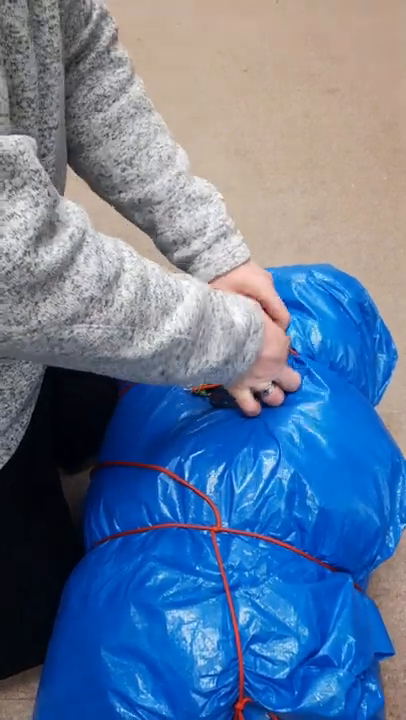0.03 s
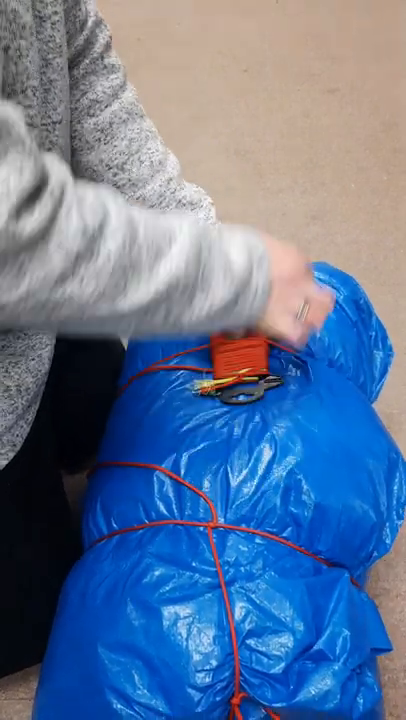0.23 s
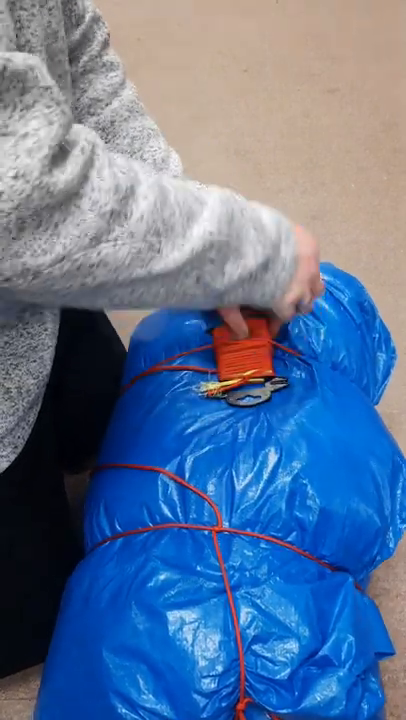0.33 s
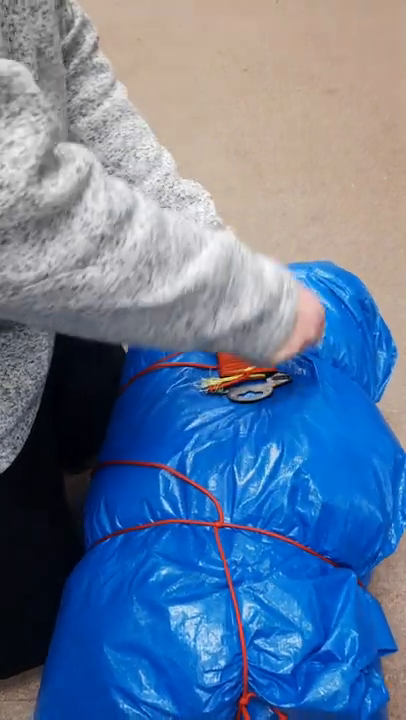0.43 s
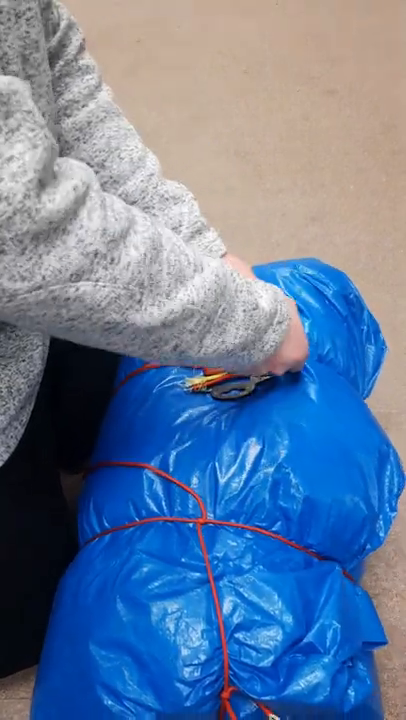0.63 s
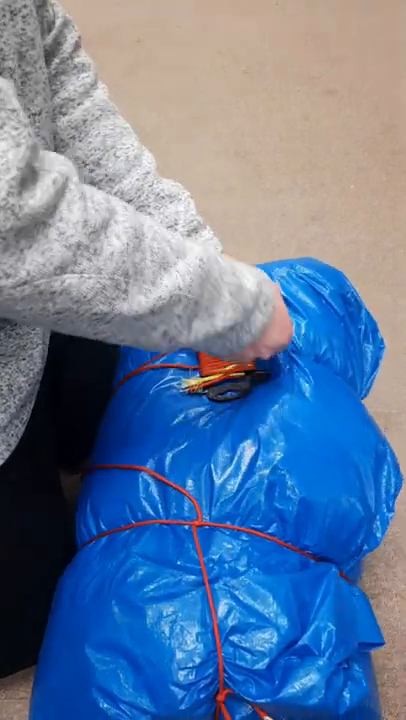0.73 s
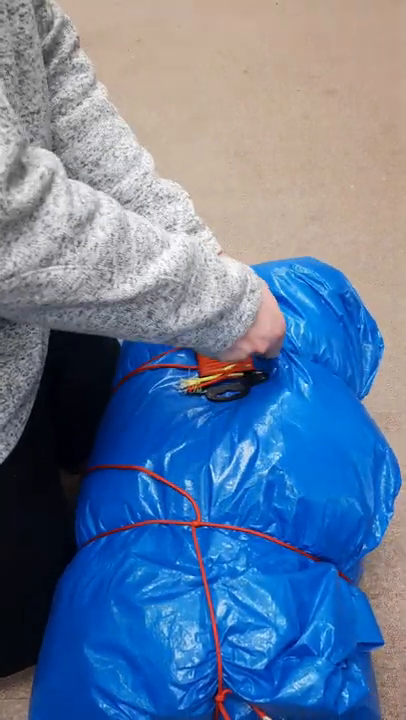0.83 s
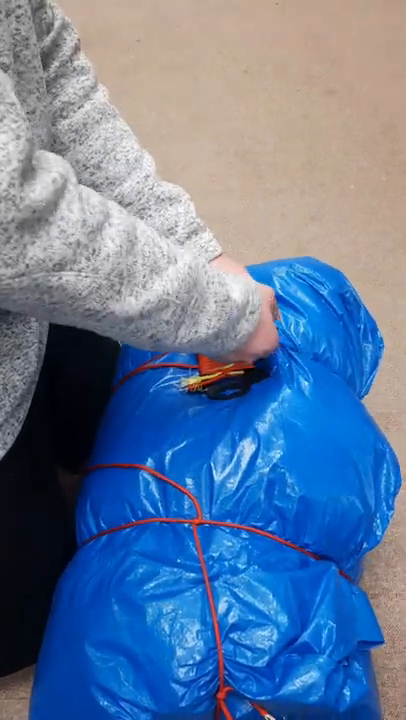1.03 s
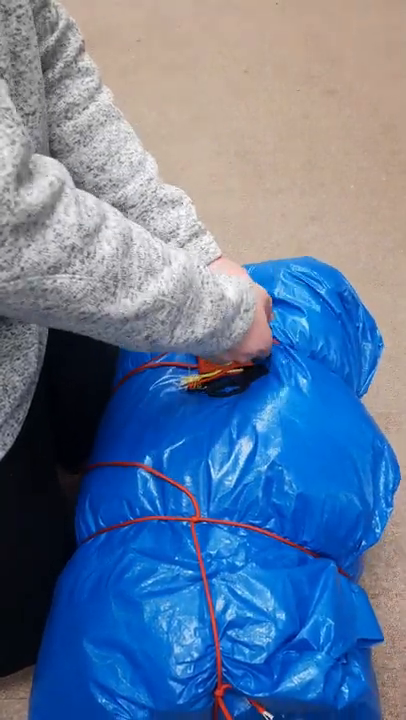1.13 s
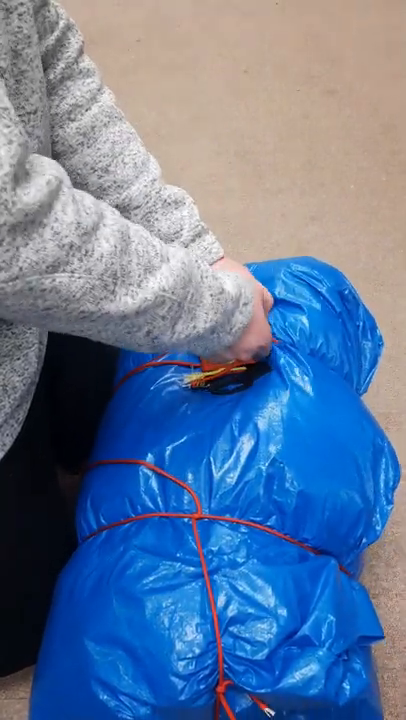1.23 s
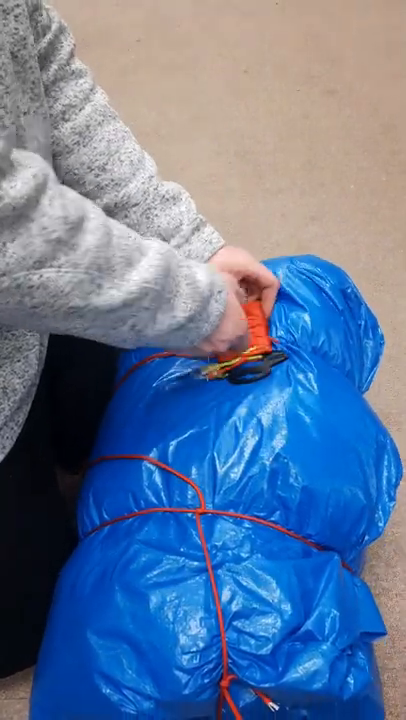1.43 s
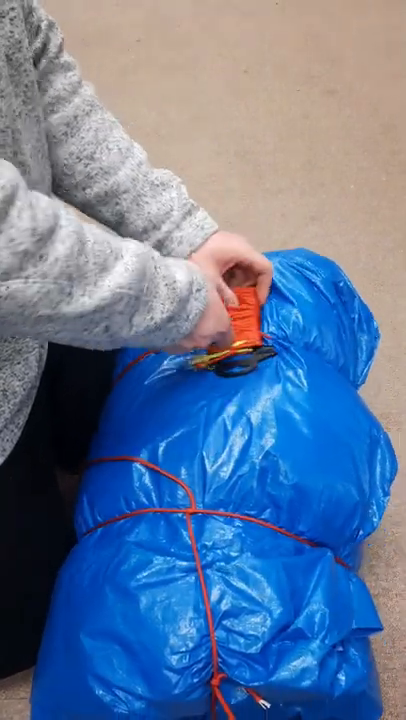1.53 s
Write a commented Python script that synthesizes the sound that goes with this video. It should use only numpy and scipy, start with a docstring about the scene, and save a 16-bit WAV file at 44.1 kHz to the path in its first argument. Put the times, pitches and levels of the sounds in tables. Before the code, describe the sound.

A plastic tarp crinkles and pops close up, then a strong hollow thump hits the taut bundle; smaller rustles and snaps follow, thinning out before a last brisk crinkle, in a small carpeted room.

```python
"""In a small carpeted room, hands work with cord on a bundle rolled in a plastic tarp.
The sheet rustles and its creases snap; the taut bundle gives one strong hollow thump and three fainter ones,
and short swishes follow as the cord is gripped and drawn tight. Rustle is shaped noise and clumped grains,
snaps and thumps are damped sines; echoes, a diffuse tail and a steady room tone surround them."""
import sys
import numpy as np
from scipy import signal
from scipy.fft import rfft, irfft
from scipy.io import wavfile

SR = 44100
rng = np.random.default_rng(int(sys.argv[2]) if len(sys.argv) > 2 else 0)


def file_out(sig):
    """Save sig as 16-bit WAV at sys.argv[1]."""
    # one column per channel
    cols = np.atleast_2d(sig).T
    # limit, then scale
    lim = np.clip(cols, -1, 1)
    pcm = np.round(lim * 32767).astype(np.int16)
    wavfile.write(sys.argv[1], SR, pcm)


N = 68355
T = np.arange(N) / SR  # time in seconds
BUNDLE_PAN_DB, RIGHT_LAG_S = .5, .00003  # left over right, and the later arrival at the right


def from_db(db):
    """Level law: decibels to amplitude gain."""
    return 10 ** (np.asarray(db) / 20)


def rms_one(x):
    """Power normalisation: scale to an rms of 1."""
    return x / np.sqrt(np.mean(x ** 2) + 1e-20)


def at_hz(points, hz):
    """Log-frequency interpolation: read a table evenly per octave."""
    table_hz, values = np.transpose(points)
    return np.interp(np.log(np.maximum(hz, 1)), np.log(table_hz), values)


def butter(x, hz, kind, order=2):
    """Causal filtering: a Butterworth response, flat in its passband."""
    sos = signal.butter(order, np.clip(hz, 10, .45 * SR), kind, fs=SR, output="sos")
    return signal.sosfilt(sos, x + 1e-18)


def coloured(x, spectrum):
    """Spectral shaping: weight each frequency by a table, then scale to an rms of 1."""
    gain = from_db(at_hz(spectrum, np.fft.rfftfreq(N, 1 / SR)))
    return rms_one(irfft(rfft(x) * gain, N))


def delayed(x, s):
    """Propagation delay: the same sound s seconds later."""
    return np.interp(T - s, T, x, left=0)


def ring(s, hz, t60):
    """Damped resonance: a sine set off at s that falls 60 dB in t60 seconds."""
    age = np.maximum(T - s, 0)
    return np.sin(2 * np.pi * hz * age) * from_db(-60 * np.minimum(age / t60, 4))


def placed(x, pan_db, lag_s):
    """Interchannel level and time difference: direct sound at the two microphones."""
    left = x * from_db(pan_db / 2)
    right = delayed(x, lag_s) * from_db(-pan_db / 2)
    return np.array([left, right])


# Likeness of the two channels in a diffuse field. Each row: frequency in Hz, likeness from 0 to 1.
LEFT_RIGHT_LIKENESS = [(100, 0.91), (250, 0.83), (500, 0.41), (1200, 0.07), (4000, 0)]


def diffuse_noise():
    """Diffuse-field coherence: white stereo noise, alike in the bass and unrelated in the treble."""
    alike = np.clip(at_hz(LEFT_RIGHT_LIKENESS, np.fft.rfftfreq(N, 1 / SR)), 0, 1)
    shares = np.sqrt([(1 + alike) / 2, (1 - alike) / 2])
    mid, side = rfft(rng.standard_normal((2, N))) * shares
    return irfft([mid + side, mid - side], N)


# Spectrum of the room tone. Each row: frequency in Hz, relative density in dB per Hz.
ROOM_TONE_SPECTRUM = [(20, -46), (40, -9), (65, 1), (120, 2.5), (200, -6), (330, -5), (500, -16),
                      (1000, -28), (3000, -33), (9000, -41.5), (16000, -41.5)]
ROOM_TONE_DB = -52


def room_tone():
    """Stationary background noise: a steady diffuse noise, strongest in the bass."""
    return from_db(ROOM_TONE_DB) * coloured(diffuse_noise(), ROOM_TONE_SPECTRUM)


CRACKLES_PER_S, CRACKLE_SPREAD_DB = 900, 4.0  # density at full activity; size scale
BUSY_DB, CALM_SHARE = -47, .12  # rustle level of full activity; least share of that density
CLUMP_DB, CLUMP_HZ = 4.0, 140  # depth and highest rate of the clumping
SMOOTH_SHARE = .33  # sliding noise beside the grains


def crackle(level):
    """Random impulse process: tiny buckles in clumps, sparser in gentle moves, over sliding noise."""
    busy = np.clip(level / from_db(BUSY_DB), CALM_SHARE, 1)
    signs = rng.choice([-1, 1], N)
    sizes = from_db(CRACKLE_SPREAD_DB * np.minimum(rng.exponential(1, N), 3)) * signs
    happens = rng.random(N) < busy * CRACKLES_PER_S / SR
    grains = rms_one(sizes * happens / np.sqrt(busy))  # sparse grains are larger, so power holds
    drift = rms_one(butter(rng.standard_normal(N), CLUMP_HZ, "low"))
    clumps = from_db(CLUMP_DB * np.clip(drift, -2, 2))
    return clumps * (grains + SMOOTH_SHARE * rng.standard_normal(N))


# The sheet is moved. Each row: start in seconds, swell in seconds, length in seconds from the start,
# rustle level in dB, treble hiss level in dB, low flapping level in dB.
SHEET_MOVES = [(-0.02, .005, 0.032, -46, -76, -35.5), (0.029, 0.0045, 0.023, -43, -57, -41.5),
               (0.057, 0.025, 0.14, -47.5, -61, -44), (0.148, 0.023, 0.047, -46.5, -50, -70),
               (0.21, 0.0014, 0.0095, -38.5, -56, -33.5), (0.528, 0.019, 0.049, -49.5, -59.5, -50.5),
               (0.641, .005, 0.029, -57, -71, -55.5), (0.7, 0.0044, 0.0089, -48, -49.5, -45.5),
               (0.827, 0.0038, 0.012, -46.5, -67, -53), (0.989, 0.008, 0.13, -63, -82, -61.5),
               (1.109, 0.015, 0.085, -58, -94, -58.5), (1.209, 0.0026, 0.029, -57.5, -85, -51),
               (1.264, .005, 0.074, -64.5, -77, -61), (1.397, 0.017, 0.07, -52, -68.5, -57),
               (1.429, 0.0086, 0.025, -42.5, -58, -55), (1.46, 0.0064, 0.10, -50.5, -59.5, -58)]
# Parts of the sheet that crinkle. Each row: left over right in dB, lag of the right side in seconds.
SHEET_PATCHES = [(15, .00009), (3, .00002), (6, -.00001)]
# Spectra of the three layers. Each row: frequency in Hz, relative density in dB per Hz.
RUSTLE_SPECTRUM = [(200, 17), (500, -20), (1000, 1), (2400, 0.5), (4000, -2), (6000, -8.5), (8000, -18),
                   (10000, -33), (16000, -54)]
HISS_SPECTRUM = [(2000, -28), (6000, 16), (8000, 8), (10000, 2), (14000, 11), (16000, 8)]
FLAPPING_SPECTRUM = [(30, -35), (60, -3.5), (100, 4), (200, -12), (340, -4), (550, -11), (1000, -14.5),
                     (3000, -39)]
RELEASE_S = 0.014  # time constant of each fade


def rustle():
    """Sheet radiation: moves raise crackle, hiss and low flapping; returns (mono, stereo, flapping)."""
    levels, mono, stereo = np.zeros((3, N)), 0, 0
    for start, swell, length, *db in SHEET_MOVES:
        rise = np.clip((T - start) / swell, 0, 1)
        fade = np.exp(-np.maximum(T - start - length, 0) / RELEASE_S)
        levels = np.maximum(levels, from_db(db)[:, None] * rise * fade)
    rustle_level, hiss_level, flapping_level = levels
    for pan_db, lag_s in SHEET_PATCHES:
        body = rustle_level * coloured(crackle(rustle_level), RUSTLE_SPECTRUM)
        hiss = hiss_level * coloured(crackle(rustle_level), HISS_SPECTRUM)
        patch = (body + hiss) / np.sqrt(len(SHEET_PATCHES))
        mono = mono + patch
        stereo = stereo + placed(patch, pan_db, lag_s)
    flapping = flapping_level * coloured(rng.standard_normal(N), FLAPPING_SPECTRUM)
    return mono, stereo, flapping


# Creases snap. Each row: start in seconds, level in dB, pitch in Hz,
# gritty edge in dB relative to the pop, left over right in dB.
CREASE_SNAPS = [(0.0250, -36, 1170, -35, 10), (0.0326, -24.5, 3230, -4.5, 6.5),
                (0.0482, -36, 3040, -26, -18), (0.0725, -28.5, 2560, -14, 6),
                (0.0816, -24.5, 2970, -36, 10.5), (0.1063, -25, 3870, -3.5, 2), (0.1245, -26, 1600, -14, 1),
                (0.1717, -53, 3500, 3, 6), (0.1761, -37, 1860, 10.5, 0), (0.2147, -14, 1620, -8, 11),
                (0.2162, -20.5, 3400, -10.5, 5.5), (0.2186, -28, 5000, -6, 0),
                (0.5020, -40, 1260, -5.5, 14), (0.53, -40, 3500, -3, 9), (0.5428, -35, 1400, -10, 6),
                (0.5715, -29.5, 2700, -3.5, 6), (0.6450, -27.5, 2600, -11.5, 6.5),
                (0.6935, -43.5, 1320, 0, 0), (0.7084, -24, 2310, -7, -0.5), (0.708, -33.5, 2310, -9, 22.5),
                (0.7801, -45, 2300, -28, 14), (0.8335, -32.5, 2200, -16, 14.5),
                (0.8390, -38.5, 2570, -12, 1), (0.8422, -51, 4160, -1, 27), (0.8885, -54, 1110, -26, 15),
                (0.9399, -40.5, 1300, -13, 7), (1.0406, -41.5, 720, -40, 11), (1.126, -42, 4200, -5, 15),
                (1.1434, -35.5, 1450, -9.5, 7), (1.1827, -39, 1700, -18, 4), (1.2150, -33.5, 1920, -17, 6),
                (1.2250, -33.5, 1210, -14, 9.5), (1.2417, -32, 6750, -7.5, -16),
                (1.2612, -36, 2120, -19, 6), (1.3778, -42.5, 902, -11, 9), (1.4145, -34.5, 1820, -22, 5),
                (1.4458, -25, 2350, -9, 0), (1.4551, -24.5, 3070, -11, 5), (1.4769, -25.5, 3900, -18, 8),
                (1.5005, -29, 3670, -14, 2), (1.5033, -34.5, 4400, -14, 24.5)]
SNAP_CYCLES = 5.9  # cycles of the pitch in a 60 dB decay
SNAP_EDGE_T60_S, SNAP_EDGE_CUT_HZ = 0.011, 3740


def snaps():
    """Snap-through buckling: a crease pops at its own pitch with a gritty edge; returns (mono, stereo)."""
    mono, stereo = 0, 0
    grit = butter(rng.standard_normal(N), [700, SNAP_EDGE_CUT_HZ], "band", order=1)
    for s, db, hz, edge_db, pan_db in CREASE_SNAPS:
        decay = np.exp(-np.log(1000) * np.clip((T - s) / SNAP_EDGE_T60_S, 0, 10))
        edge = grit * (T >= s) * decay
        pop = butter(ring(s, hz, SNAP_CYCLES / hz), 2 * hz, "low", order=1)
        snap = from_db(db) * (pop + from_db(edge_db) * edge)
        mono = mono + snap
        stereo = stereo + placed(snap, pan_db, RIGHT_LAG_S)
    return mono, stereo


# The bundle is struck. Each row: start in seconds, level in dB, low cut of the modes in Hz.
BUNDLE_BLOWS = [(0.2154, 0.5, 76), (1.1620, -48, 70), (1.2610, -38, 69.5), (1.4360, -20.5, 422)]
# Modes of the taut sheet over its filling. Each row: frequency in Hz, relative level in dB,
# 60 dB decay time in seconds.
BUNDLE_MODES = [(127, -17, 0.055), (154.4, -16.5, 0.076), (201, -7, 0.09), (315, 0, 0.024),
                (411, -17, 0.029), (595, -10, 0.0075)]
CONTACT_HZ = 747  # a soft contact excites little above this


def thumps():
    """Modal excitation: soft blows boom like a damped drum; the last, light one misses the deep modes."""
    boom = 0
    for s, db, lowest_hz in BUNDLE_BLOWS:
        modes = sum(from_db(mode_db) * ring(s, hz, t60) for hz, mode_db, t60 in BUNDLE_MODES)
        boom = boom - from_db(db) * butter(modes, lowest_hz, "high", order=3)
    return butter(boom, CONTACT_HZ, "low", order=4)


# Near surfaces return the thump. Each row: delay in seconds, level in dB before the treble cut.
NEAR_ECHOES = [(0.0126, -5), (0.0186, -12.5), (.0320, -12.5), (0.055, -15.5)]
# The far wall returns the middle of the boom. Its one row: delay in seconds, level in dB,
# low band edge in Hz, high band edge in Hz.
FAR_WALL_ECHO = (.1150, -15, 260, 360)
ECHO_CUT_HZ = 413


def reflections(boom):
    """Discrete reflection: dull inverted echoes from near surfaces, a hollow one from the far wall."""
    near = butter(sum(from_db(db) * delayed(boom, s) for s, db in NEAR_ECHOES), ECHO_CUT_HZ, "low")
    s, db, low_hz, high_hz = FAR_WALL_ECHO
    far = from_db(db) * butter(delayed(boom, s), [low_hz, high_hz], "band")
    return far - near


# How long the room rings. Each row: frequency in Hz, 60 dB decay time in seconds.
ROOM_DECAY = [(60, .5), (200, .5), (330, .41), (600, .33), (1100, .33), (3000, .33), (8000, .28),
              (16000, .21)]
# Strength of the tail. Each row: frequency in Hz, relative level in dB.
ROOM_LEVEL = [(60, -3), (150, -7), (320, 2.5), (550, 0.5), (900, -1), (2000, -0.5), (8000, -2.5),
              (16000, -1)]
ROOM_BUILD_S = 0.0032


def room(x):
    """Reverberation: convolution with a diffuse tail that builds up, then dies away band by band."""
    edges = np.geomspace(40, 18000, 14)  # band edges in Hz
    noise, tail = diffuse_noise(), 0
    build_up = 1 - np.exp(-(T / ROOM_BUILD_S) ** 2)
    for low, high in zip(edges, edges[1:]):
        hz = np.sqrt(low * high)
        decay = from_db(-60 * T / at_hz(ROOM_DECAY, hz))
        band = butter(noise, [low, high], "band", order=3) * decay * build_up
        width_gain = np.sqrt(2 * (high - low) / SR / N)  # equal energy per Hz
        tail = tail + rms_one(band) * width_gain * from_db(at_hz(ROOM_LEVEL, hz))
    return signal.fftconvolve(x[None], tail, axes=1)[:, :N]


TARP_ROOM_DB, THUMP_ROOM_DB = -2, -2.5  # sent to the room


def scene():
    """Superposition: tarp and bundle close by, a little to the left, with the room around them."""
    crinkle, placed_crinkle, flapping = rustle()
    pops, placed_pops = snaps()
    boom = thumps()
    bundle = placed(boom + reflections(boom) + flapping, BUNDLE_PAN_DB, RIGHT_LAG_S)
    direct = placed_crinkle + placed_pops + bundle
    to_room = from_db(TARP_ROOM_DB) * (crinkle + pops + flapping) + from_db(THUMP_ROOM_DB) * boom
    return direct + room(to_room) + room_tone()


MIC_LOW_CUT_HZ, CUTOFF_HZ = 51.4, 16000


def record(dry):
    """Band limiting and clipping: deep bass is lost, peaks stop at full scale and the top is cut."""
    lean = butter(dry, MIC_LOW_CUT_HZ, "high", order=4)
    top_cut = signal.ellip(10, .2, 80, CUTOFF_HZ, fs=SR, output="sos")  # .2 dB ripple, 80 dB stopband
    return signal.sosfilt(top_cut, np.clip(lean, -1, 1))


dry = scene()
out = record(dry)
file_out(out)
```